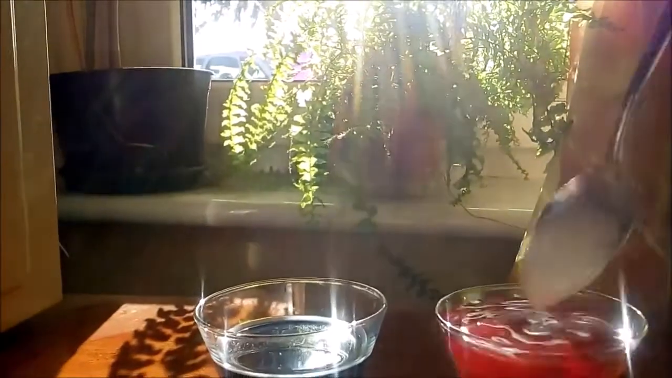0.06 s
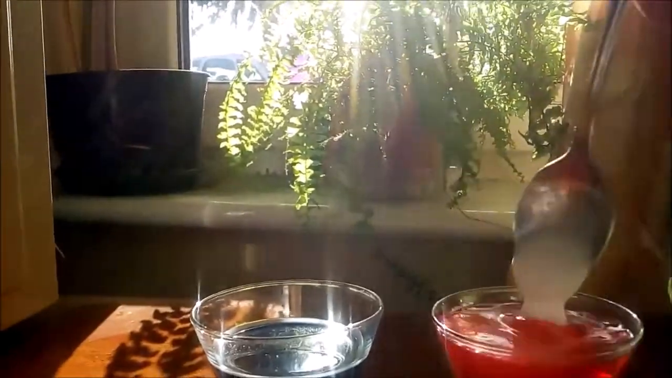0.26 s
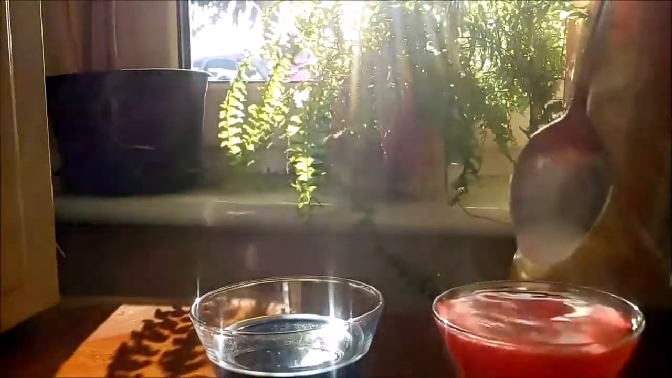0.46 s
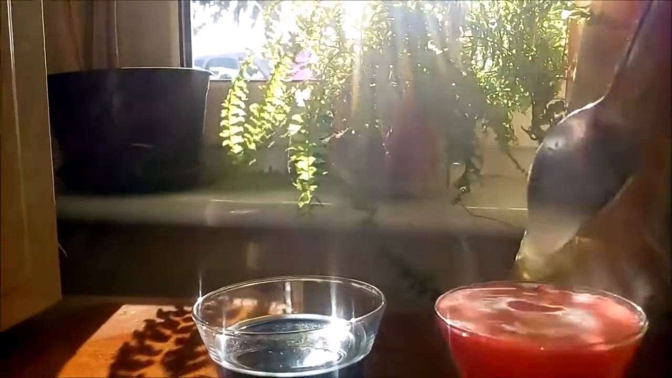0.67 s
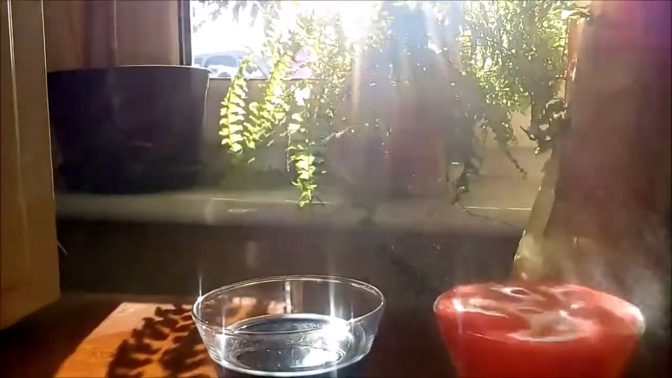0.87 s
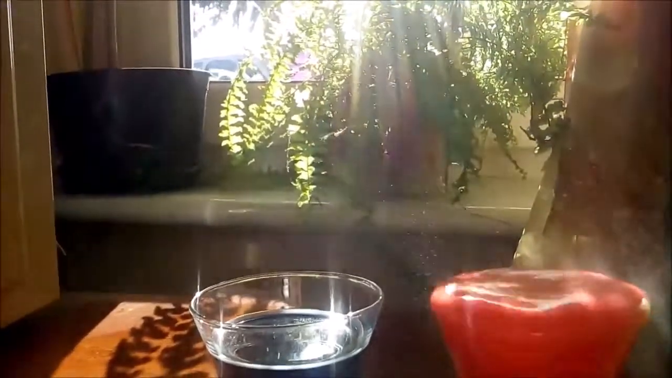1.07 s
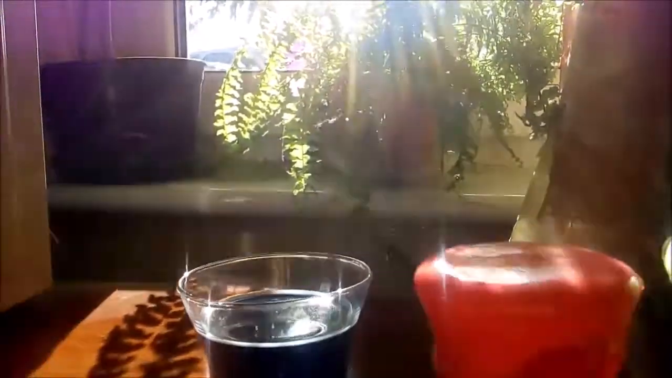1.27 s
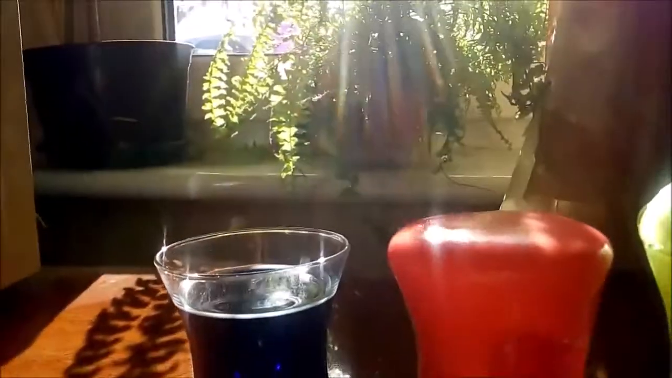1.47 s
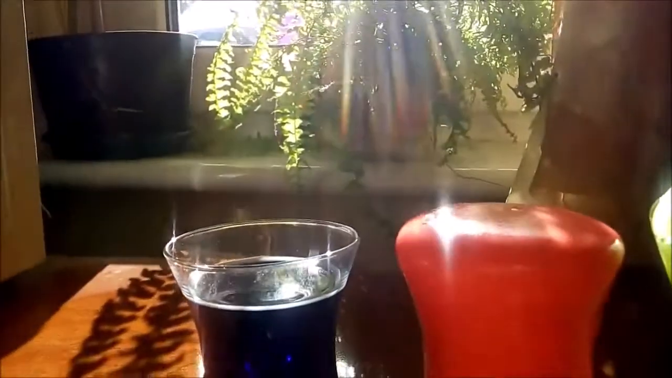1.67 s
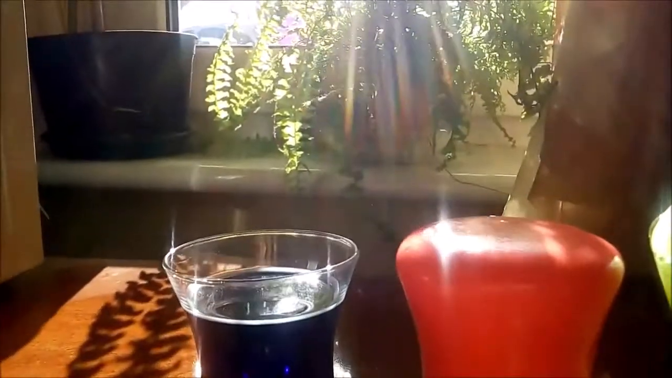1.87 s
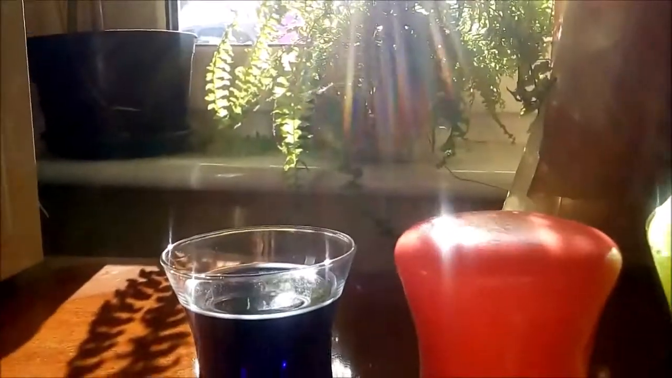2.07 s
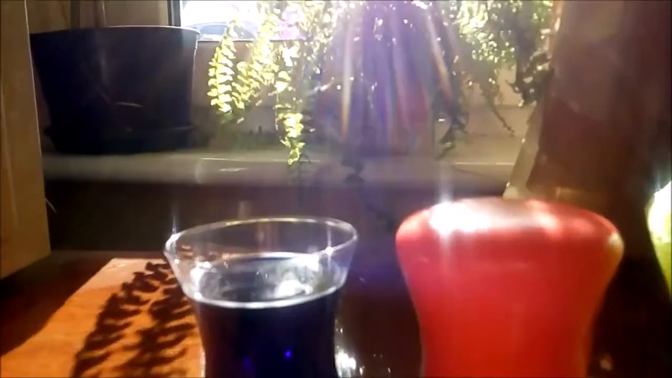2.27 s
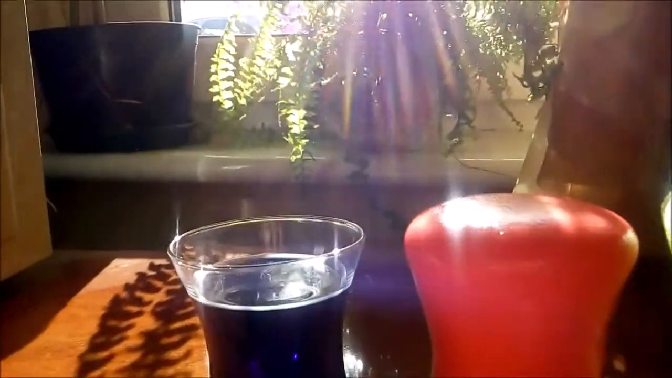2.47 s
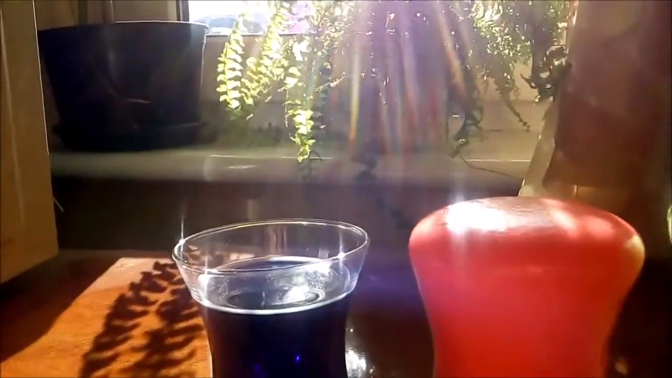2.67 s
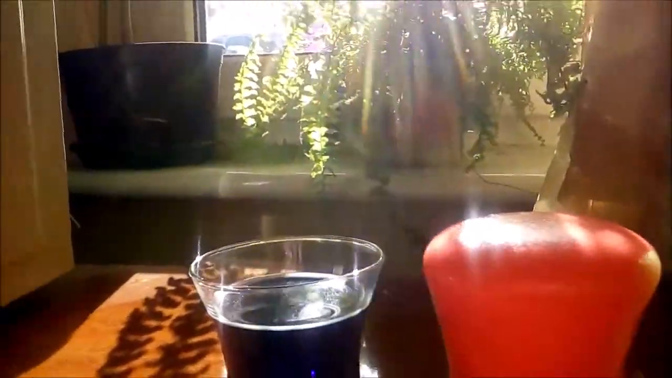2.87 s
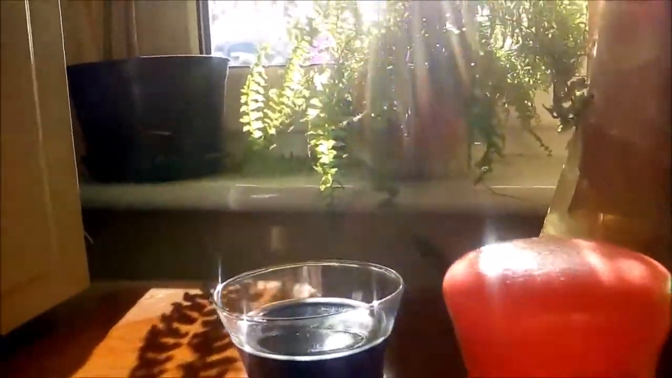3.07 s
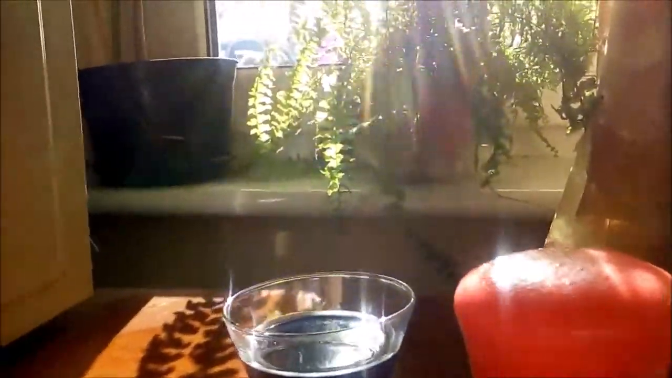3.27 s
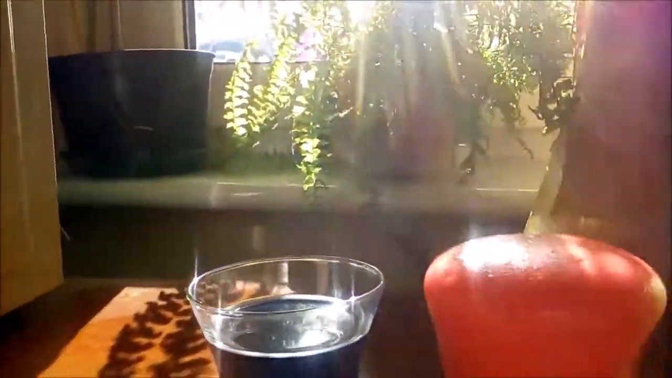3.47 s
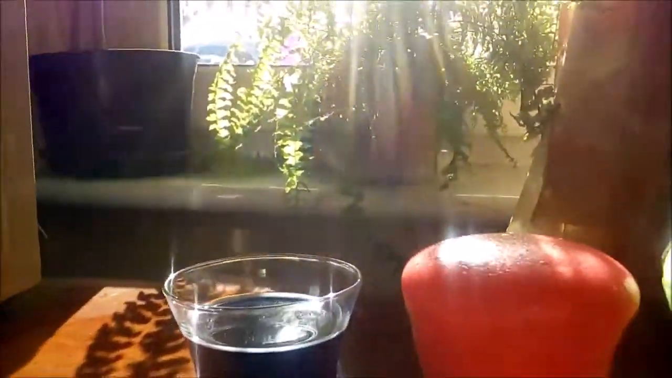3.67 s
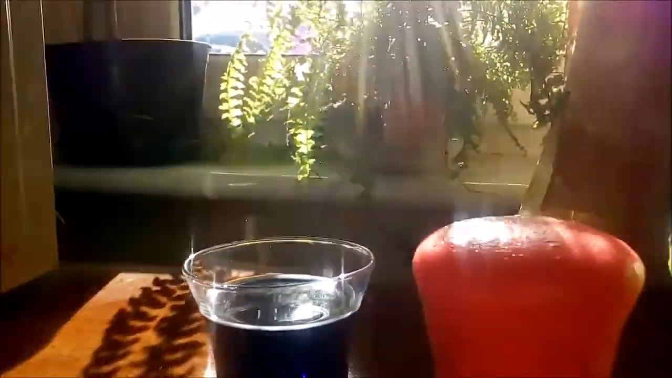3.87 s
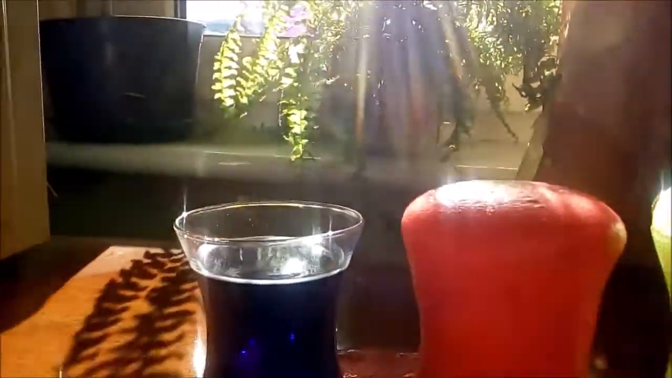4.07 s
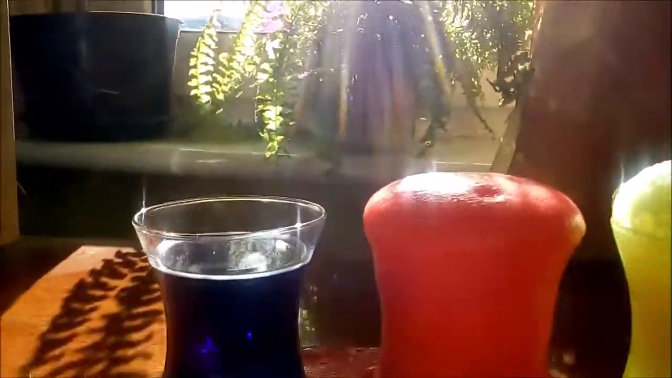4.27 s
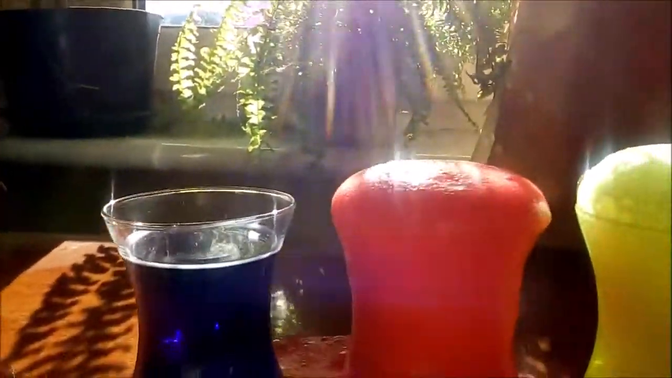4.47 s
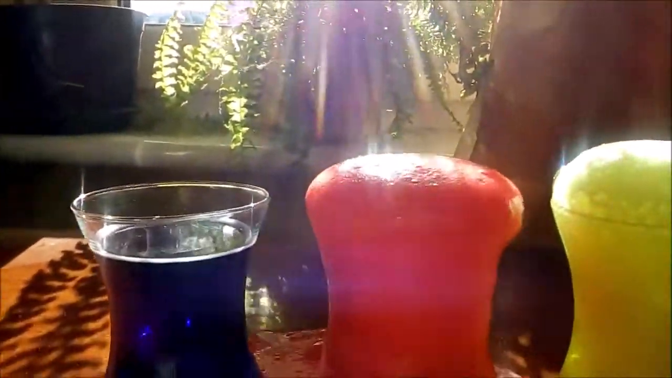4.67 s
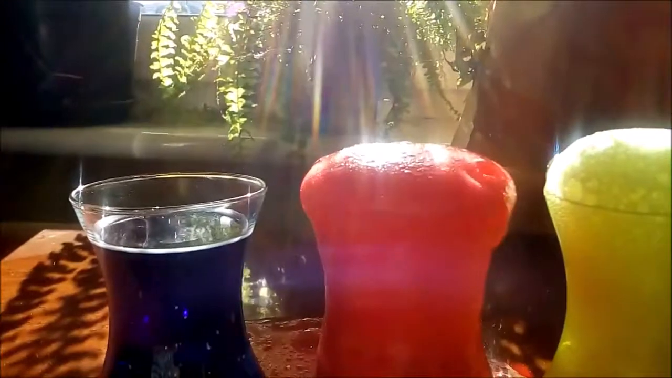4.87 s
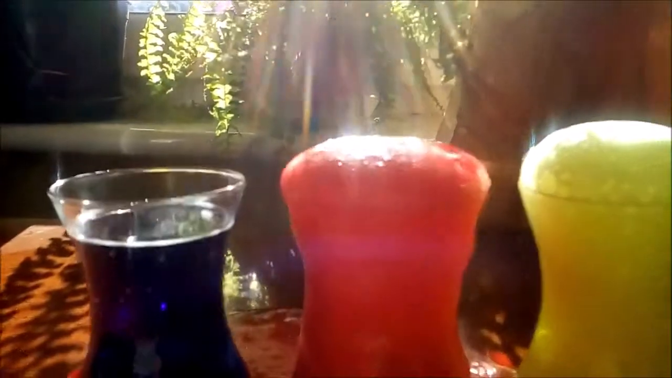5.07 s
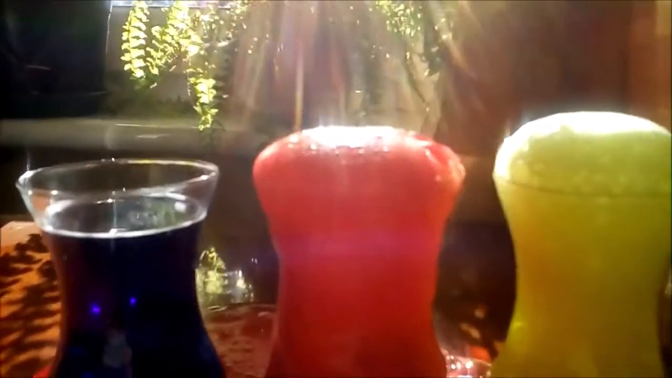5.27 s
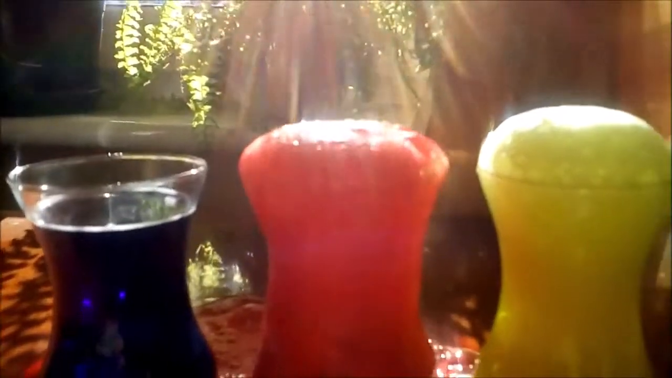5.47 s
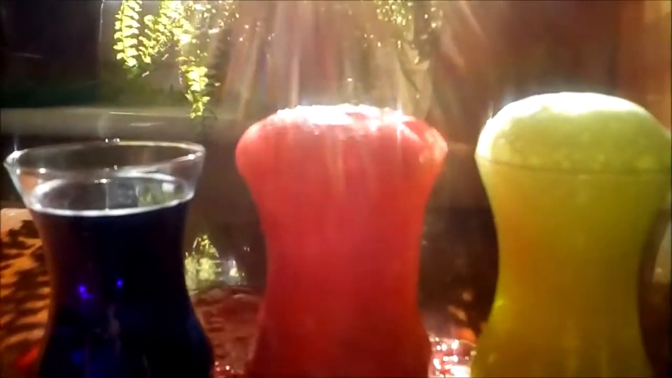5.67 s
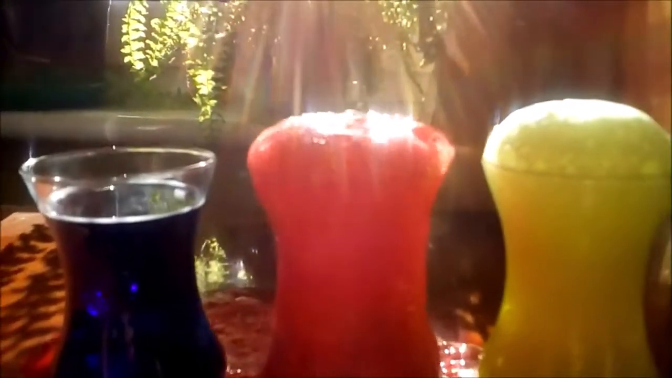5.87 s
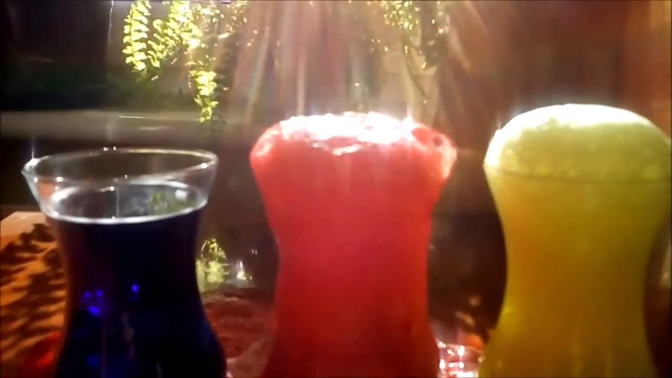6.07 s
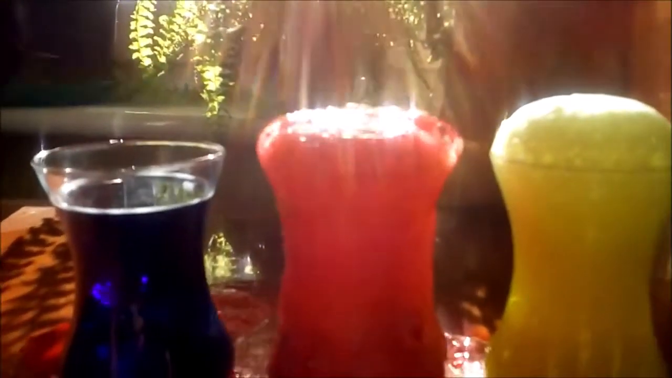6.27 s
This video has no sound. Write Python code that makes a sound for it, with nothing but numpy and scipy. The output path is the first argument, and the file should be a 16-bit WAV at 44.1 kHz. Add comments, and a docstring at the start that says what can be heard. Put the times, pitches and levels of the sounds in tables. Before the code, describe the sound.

Liquid fizzes in a glass, close to the microphone in a small, quiet room. From about 0.5 seconds the fizz comes in faint, thin, high surges, with three soft spoon taps around 1 second. Near 1.4 seconds a glass knocks and clinks on a wooden table, and the fizz jumps to a dense, frothy hiss. Two short squeaks of wet glass follow at 1.6 and 1.9 seconds, with another knock between them, then a clink and a light juddering scrape around 2.3 seconds. By 3 seconds the hiss of tiny popping bubbles is at its fullest and holds steady. Between 4.2 and 5 seconds glass is nudged and rocks on the wood in a cluster of knocks and short rubs, followed by a light clink at 5.2 seconds. Meanwhile the hiss begins to calm, growing thinner, higher and quieter to the end.

```python
"""Fizzing glass on a wooden table

Powder spooned into coloured liquid fizzes: first ringing the air in the glass, then as rising froth,
then as a dome of foam that swells over the rim and slowly calms. All three are clustered noise bursts
with moving colours. Knocks, clinks and taps are decaying modes with noisy cracks or scuffs; rubs and
squeaks are bands of friction noise. A small room, one close microphone; at moments the level dips briefly.
"""
import sys
import numpy as np
from scipy import signal
from scipy.fft import rfft, irfft, next_fast_len
from scipy.io import wavfile
from scipy.ndimage import uniform_filter1d, map_coordinates

SR = 44100
rng = np.random.default_rng(int(sys.argv[2]) if len(sys.argv) > 2 else 0)


def wav_record(signal):
    """Record a signal, one row per channel, as 16-bit PCM in the file named by sys.argv[1]."""
    frames = np.transpose(np.atleast_2d(signal))
    bounded = np.clip(frames, -1, 1)
    # unit amplitude maps onto the largest positive 16-bit level
    quanta = np.round(bounded * 32767).astype(np.int16)
    wavfile.write(sys.argv[1], SR, quanta)


N = 278712

# colour of the room's faint rush: freq_hz, relative level_db
ROOM_TONE_COLOUR = [(15, -35), (28, -13), (60, -7.5), (210, -6), (400, -10), (800, -13.5), (2000, -16),
                    (8000, -17.5), (15800, -25)]
# decay of the room by band: freq_hz, t60_s
ROOM_DECAY = [(150, 0.49), (400, 0.28), (1000, 0.29), (4000, 0.21), (12000, 0.29)]
# table, sill and window send the fizz back: delay_s, level_db
REFLECTIONS = [(.0019, -21), (.0043, -18), (.0071, -18), (.0118, -18), (.0174, -19)]
# brief dips in level, bass and treble most: centre_s, length_s, drop_db, bass_top_hz, middle_drop_db
LEVEL_DIPS = [(.283, .016, 9, 2500, 1), (.848, .034, 22, 2500, -1.5), (1.179, .016, 9, 2500, 0.5),
              (2.076, 0.02, 15, 2630, -0.5), (2.441, 0.046, 29, 2120, -1.5), (2.706, 0.03, 20, 1400, 1),
              (3.013, 0.018, 14, 1000, 0.5), (3.141, 0.015, 12, 1000, 1.5), (3.331, 0.013, 13, 1000, 0),
              (5.669, 0.031, 16, 1700, 0), (5.768, 0.017, 12, 2700, 1.5), (5.873, 0.021, 12, 2000, 2),
              (6.0, 0.019, 12, 1500, 0), (6.129, .012, 8, 1500, 0.5), (6.17, .014, 13, 1900, 0.5),
              (6.234, .014, 7, 1500, -0.5)]

# light taps while the spoon is emptied: start_s, level_db
SPOON_TAPS = [(.966, -64), (1.014, -72), (1.066, -79)]
# modes a tap rings with: freq_hz, relative level_db, t60_s
TAP_MODES = [(310, -8, .1), (520, -10, .08), (735, -7, .05), (1140, -4, .05), (1324, 0, .06),
             (2850, 2, 0.033)]
# glass dragged or nudged on the table: start_s, length_s, centre_hz, width_hz, level_db
TABLE_RUBS = [(1.602, 0.08, 1080, 432, -55), (1.653, 0.045, 947, 400, -66), (2.1, 0.17, 703, 912, -67),
              (2.275, 0.16, 339.7, 260.5, -60), (3.223, 0.048, 140, 170, -60),
              (4.228, 0.057, 166, 159, -66.5), (4.46, 0.15, 619, 1254, -62.5), (4.87, 0.13, 760, 1104, -64),
              (4.44, 0.11, 144, 80, -70), (4.86, .1, 145, 80, -70)]
# squeaks of wet glass: start_s, length_s, level_db, initial_sharpness_hz
WET_SQUEAKS = [(1.601, 0.038, -51, 80), (1.852, 0.053, -46.5, 200)]
# blows on the table: start_s, relative knock_db, thud_db against the knock, ring length (share of free t60),
# loss_db per rebound, contact click_peak_db, brightest_hz, click width (natural log of frequency)
TABLE_BLOWS = [(1.4451, -28.5, 0.5, 0.83, 6, -33, 5470, 0.77), (1.658, -52, -3, .77, 9, -51, 3400, .6),
               (1.8326, -34.5, 6.5, 0.93, 24, -16, 4160, 0.52),
               (2.2447, -35.5, -9, .65, 15, -32.5, 2800, 0.83), (3.243, -57, 4, .28, 12, -48, 650, 0.94),
               (4.259, -47.5, 3, 0.42, 9, -46, 595, .9), (4.448, -42.5, -1.5, .35, 14, -38, 850, 0.47),
               (4.4792, -45, 12, .22, 18, -38, 2200, .8), (4.497, -39, 6, .19, 22, -34.5, 1160, 0.74),
               (4.506, -55, 0, .2, 20, -48, 1000, .4), (4.511, -51, 6.5, 0.26, 7, -45, 1000, .8),
               (4.603, -55.5, 3.5, .5, 12, -52, 1500, .8), (4.783, -54, -6, .46, 12, -49, 1150, .3),
               (4.834, -43.5, 2, .36, 19, -39, 1700, 0.95), (4.843, -45, 1, 0.36, 18, -37, 1500, .7),
               (4.886, -40, 10, .22, 21, -33.5, 1900, 0.85), (4.892, -44, 2, .25, 17, -40, 1700, .8)]
# modes of the free table top: freq_hz, relative level_db, t60_s
TABLE_MODES = [(135, -29, 0.13), (228, -18.5, 0.18), (282.7, -5.5, 0.15), (321, -6.5, 0.09),
               (354, -3, 0.13), (390, -4.5, 0.075), (404.5, -1, 0.12), (510, -11.5, 0.066),
               (650, -5.5, 0.044), (732, -6, 0.081), (802, -2.5, 0.072), (882, -3.5, 0.078),
               (938, 5, 0.025), (1002, -3, 0.078), (1074, -5.5, 0.039), (1203, -5, 0.052),
               (1760, -15, 0.079), (1970, -16, 0.065)]
# slips of a pushed glass juddering over the table: start_s, relative level_db
JUDDER_SLIPS = [(2.262, -64), (2.289, -65), (2.307, -67), (2.337, -65), (2.362, -69), (2.382, -69.5),
                (2.403, -70.5), (2.419, -68)]
# light clinks and big bursting bubbles that leave the table still: start_s, peak_db, brightest_hz
LIGHT_CLINKS = [(1.661, -37.5, 3500), (2.257, -32, 6500), (4.318, -37.5, 2370), (4.948, -41, 2000),
                (5.217, -31, 6600), (5.221, -42, 6640)]
# modes of spoon on glass: freq_hz, relative level_db, t60_s
SPOON_MODES = [(2070, -29, 0.024), (2820, -6, 0.027), (3550, -6, 0.043), (3940, -8, 0.037),
               (4370, -2.5, 0.037), (4630, 10, 0.0038), (6000, -11, 0.023), (6670, 2.5, 0.04),
               (7140, -9, 0.097)]
# colour of every clink: freq_hz, relative level_db
CLINK_TONE = [(60, -30), (400, 1.5), (7200, -7), (8200, -16), (9500, -10), (10700, -7), (12000, -13),
              (15000, -20)]

# resonances of the air above the liquid, before tuning: centre_hz, width_hz, relative level_db
AIR_MODES = [(2790, 200, -2), (3650, 450, 0.5), (4090, 660, 1), (5430, 510, -4.5), (6130, 470, 2),
             (6720, 480, 0)]
# the lower air resonances sag and recover as the liquid heaves: time_s, pitch_ratio
LOWER_AIR_TUNING = [(.55, 1.06), (.75, .99), (.88, 0.91), (1.02, .99), (1.35, 1.06)]
# each lump of powder makes the fizz surge: peak_s, rise_s, upper resonances level_db, lower level_db
POWDER_SURGES = [(.56, 0.083, -68.5, -75), (.72, 0.12, -62, -67.5), (.83, 0.08, -66, -65),
                 (.99, 0.063, -66, -84), (1.07, 0.059, -67.5, -71), (1.43, 0.21, -65.5, -69)]
# fizz between surges: upper resonances level_db, lower resonances level_db
SIMMER_LEVELS = [-80.5, -85.5]
# colour of the froth: freq_hz, relative level_db
FROTH_TONE = [(250, -43), (600, -6), (900, -10), (1250, -1.5), (2000, -3.5), (2700, -0.5), (3600, -0.5),
              (4300, -1), (5000, -1.5), (5700, -1), (7000, -3.5), (8000, -13), (10000, -21.5),
              (12000, -23.5), (15800, -32)]
# colour of the foam dome: freq_hz, relative level_db
DOME_TONE = [(200, -7), (600, 4), (1100, -1), (2000, 0.5), (2600, -1), (3300, -0.5), (5500, -3), (7000, -3),
             (7700, -7.5), (9000, -13.5), (10000, -17.5), (11000, -20), (13000, -35)]
# colour of the finest bubbles: freq_hz, relative level_db
FINE_TONE = [(7000, -14), (9500, -2), (11000, -2), (12500, 1), (13700, -1), (14700, -2), (16000, -12)]

TOP_HZ = 15800
DIP_TREBLE_HZ = 8000  # where the treble of a dip begins
# scuff under a tap: share of the tap level, then length, centre and width
TAP_SCUFF, TAP_SCUFF_S, TAP_SCUFF_HZ, TAP_SCUFF_WIDTH_HZ = 0.37, 0.05, 1147, 697
CATCHES_PER_S, CATCH_DB = 228, 4  # the glass catches on the wood grain: how often, how unevenly
SQUEAK_HZ, SQUEAK_WIDTH_HZ, SQUEAK_SAG_S = 3560, 92, 0.018  # settled pitch, width, how soon it settles

GAP_HZ, GAP_WIDTH_HZ = 590, 42  # the table hardly sounds between its low and high modes
THUD_RISE_S, KNOCK_ROOM_DB = 0.0032, -5  # swell of the low modes; the room's answer to a blow
SLIP_THUD_DB, SLIP_LENGTH = 14, 0.49  # a slip stirs mostly low modes, and the hand damps them
# a struck glass rocks: first gap, each gap over the last, unevenness (natural log)
REBOUND_S, REBOUND_SHRINK, REBOUND_SCATTER = 0.025, 0.82, 0.0617
CRACK, CRACK_T60_S, SNAP = 4.1, 0.012, 11.5  # before filtering: noisy crack, its decay, first sharp snap
CLINK_SPREAD, LEAD_S = 0.26, 0.004  # light clink width (natural log of frequency); silence before a snap

SURGE_FALL_DB_PER_S = 47
AIR_SPLIT_HZ = 4800  # between the lower and upper resonances
SIMMER_CLUSTER_DB, FOAM_CLUSTER_DB = 1.2, 0.8
# the froth comes up fast, keeps growing, and gives way to the dome
FROTH_FULL_S, FROTH_END_S, FROTH_DB = 1.466, 2.724, -51.5
FROTH_RISE_DB_PER_S, FROTH_GROWTH_DB_PER_S, FROTH_FALL_DB_PER_S = 240, 1.9, 47
# the low edge of its hiss sinks as the bubbles grow, and drops further once the foam bulges
FROTH_EDGE_START_HZ, FROTH_EDGE_END_HZ, FROTH_COARSEN_S, EDGE_HALVE_S = 4500, 1970, 0.69, 0.3
# the dome bulges over the rim, holds, then calms ever faster in ever more distinct clusters
DOME_FULL_S, DOME_DB, DOME_RISE_DB_PER_S = 2.888, -47.5, 55
CALM_FROM_S, CALM_DB_PER_S2, CALM_CLUMPING_DB_PER_S = 4.084, 1.38, 0.6
DOME_EDGE_HZ, EDGE_HZ_PER_DB = 1417, 135  # the low edge of its hiss rises as it calms
# the finest bubbles come up later, multiply, and calm less
FINE_DB, FINE_FULL_S, FINE_RISE_DB_PER_S = -63, 3.2, 9
FINE_GROWTH_DB_PER_S, FINE_CALM_SHARE = 1.45, 0.67
# the hollow in the hiss leaps up with the bulge, then creeps on and deepens
BULGE_AT_S, BULGE_S = 2.62, 0.23
HOLLOW_START_HZ, HOLLOW_LEAP_HZ, HOLLOW_CREEP_HZ_PER_S = 1410, 2340, 136
HOLLOW_DB, HOLLOW_DEEPEN_DB_PER_S = 7.5, 0.05
HOLLOW_OPEN_S, UPPER_HOLLOW_OPEN_S = 0.08, 0.26
UPPER_HOLLOW_RATIO = 2.433  # against the hollow frequency
RIDGE_RATIO, RIDGE_SHARE = 1.49, 0.22  # bright band between the hollows: frequency, height


def amp(db):
    """Decibels to gain."""
    return 10 ** (np.asarray(db) / 20)


def unit(x):
    """Scale to rms 1."""
    return x / np.sqrt(np.mean(x ** 2) + 1e-20)


def since(t, s):
    """Seconds passed since s, zero before."""
    return np.maximum(t - s, 0)


def along(points, hz):
    """Read (frequency, value) points on a log-frequency axis."""
    f, v = np.transpose(points)
    return np.interp(np.log(hz + 1), np.log(f + 1), v)


def above(hz, edge_hz, steepness):
    """High-pass gain."""
    return 1 / np.sqrt(1 + (edge_hz / (hz + 1)) ** steepness)


def filtered(x, response):
    """Shape x by a response of frequency, padded so its tail does not wrap round."""
    m = next_fast_len(x.shape[-1] + 8192)
    spectrum = rfft(x, m) * response(np.fft.rfftfreq(m, 1 / SR))
    return irfft(spectrum, m)[..., :x.shape[-1]]


def add(track, s, sound):
    """Mix a sound into the track at s seconds."""
    part = track[round(s * SR):][:len(sound)]
    part += sound[:len(part)]


def room_tone():
    """The faint steady rush of the room, as coloured noise."""
    rush = filtered(rng.standard_normal(N), lambda hz: amp(along(ROOM_TONE_COLOUR, hz)))
    return amp(-75.5) * unit(rush)


def room(x):
    """The room's answer: a noise tail with its own decay in each band."""
    hz, t, z = signal.stft(rng.standard_normal(SR // 2), SR, nperseg=256)
    decay = amp(-60 * t / along(ROOM_DECAY, hz)[:, None])
    onset = 1 - np.exp(-t / 0.0019)
    tail = signal.istft(z * decay * onset, SR, nperseg=256)[1]
    low_band = rfft(tail)[:len(tail) // 20]
    tail = tail / np.sqrt(np.mean(abs(low_band) ** 2))  # unit gain in the low band
    return signal.fftconvolve(x, tail)[:len(x)]


def friction(length, hz, width_hz):
    """A band of friction around hz that swells quickly and fades: two random grips on a carrier."""
    u = np.linspace(0, 1, round(length * SR))
    grip = [map_coordinates(rng.standard_normal(size=512), [u * length * width_hz], mode="mirror")
            for _ in range(2)]
    phase = 2 * np.pi * np.cumsum(hz * np.ones_like(u)) / SR
    band = grip[0] * np.cos(phase) + grip[1] * np.sin(phase)
    return np.sin(np.pi * u ** 0.45) * unit(band)


def rubs():
    """Glass dragged a little way: dull and broad on wood, a narrow sagging squeak where it is wet."""
    out = np.zeros(N)
    for s, length, hz, width_hz, db in TABLE_RUBS:
        slide = friction(length, hz, width_hz)
        grain = np.arange(len(slide)) * CATCHES_PER_S / SR
        catches = map_coordinates(rng.standard_normal(size=512), [grain], mode="mirror")
        add(out, s, amp(db) * slide * unit(amp(CATCH_DB * catches)))
    for s, length, db, sharp_hz in WET_SQUEAKS:
        t = np.arange(round(length * SR)) / SR
        pitch_hz = SQUEAK_HZ + sharp_hz * np.exp(-t / SQUEAK_SAG_S)
        add(out, s, amp(db) * friction(length, pitch_hz, SQUEAK_WIDTH_HZ))
    return out


def taps():
    """Soft taps: a short hollow ring of decaying modes and a friction scuff."""
    out, t = np.zeros(N), np.arange(SR // 4) / SR
    for s, db in SPOON_TAPS:
        ring = sum(rng.choice([-1, 1]) * amp(level - 60 * t / t60) * np.sin(2 * np.pi * hz * t)
                   for hz, level, t60 in TAP_MODES)
        add(out, s, amp(db) * ring)
        scuff = friction(TAP_SCUFF_S, TAP_SCUFF_HZ, TAP_SCUFF_WIDTH_HZ)
        add(out, s, amp(db) * TAP_SCUFF * scuff)
    return out


def rocking(db, loss_db, count):
    """A blow and its generally quicker, ever weaker rebounds, as (seconds after the blow, level in dB)."""
    k = np.arange(count)
    gaps = REBOUND_S * REBOUND_SHRINK ** k * np.exp(REBOUND_SCATTER * rng.standard_normal(count))
    return zip(np.cumsum(gaps) - gaps, db - loss_db * k)


def table_ring(thud_db, length):
    """One contact rings the table top: high modes answer at once, low ones take a moment to swell."""
    t, ring = np.arange(SR // 4) / SR, 0
    thud = amp(thud_db) * (1 - np.exp(-t / THUD_RISE_S))
    for hz, db, t60 in TABLE_MODES:
        decay = amp(db + rng.normal(0, 0.75) - 60 * t / (t60 * length))
        mode = decay * np.sin(2 * np.pi * hz * t)
        ring = ring + rng.choice([-1, 1]) * mode * (thud if hz < GAP_HZ else 1)
    return ring


def knocks():
    """Glasses are set down, rock and judder; each blow sets how strongly the table's low modes sound."""
    out = np.zeros(N)
    for start, knock_db, thud_db, length, loss_db, *_ in TABLE_BLOWS:
        blow = np.zeros(SR)
        for s, db in rocking(knock_db, loss_db, count=6):
            add(blow, s, amp(db - 7.5) * table_ring(thud_db, length))
        add(out, start, blow + amp(KNOCK_ROOM_DB) * room(blow))
    for s, db in JUDDER_SLIPS:
        add(out, s, amp(db) * table_ring(SLIP_THUD_DB, SLIP_LENGTH))
    out = signal.lfilter(*signal.iirnotch(GAP_HZ, GAP_HZ / GAP_WIDTH_HZ, fs=SR), out)
    # a small table radiates little bass
    return signal.sosfilt(signal.butter(N=2, Wn=105, btype="high", fs=SR, output="sos"), out)


def clinks():
    """A sharp snap, a noisy crack and a short ring of modes, damped by the liquid."""
    out, t = np.zeros(N), np.arange(SR // 4) / SR
    contacts = [(s, click_db, bright_hz, spread) for s, *_, click_db, bright_hz, spread in TABLE_BLOWS]
    contacts += [(*row, CLINK_SPREAD) for row in LIGHT_CLINKS]
    for s, db, bright_hz, spread in contacts:
        def focus(hz):
            """Bright band of this contact."""
            return np.exp(-(np.log((hz + 1) / bright_hz) / spread) ** 2)

        def colour(hz):
            """Clink tone without the bass."""
            return amp(along(CLINK_TONE, hz)) * above(hz, bright_hz / 4, steepness=3)

        strengths_db = rng.normal(0, 2, len(SPOON_MODES))
        ring = 0
        for (hz, level, t60), extra_db in zip(SPOON_MODES, strengths_db):
            decay = amp(level + extra_db - 60 * t / t60)
            ring = ring + rng.choice([-1, 1]) * focus(hz) * decay * np.sin(2 * np.pi * hz * t)
        crack = CRACK * rng.standard_normal(len(t)) * amp(-60 * t / CRACK_T60_S)
        crack[0] += SNAP
        # silence first, so the snap is not cut
        ring, crack = np.pad([ring, crack], [(0, 0), (round(LEAD_S * SR), 0)])
        hit = filtered(ring + filtered(crack, focus), colour)
        add(out, s - LEAD_S, amp(db) * hit / abs(hit).max())
    return out + amp(-13) * room(out)


def bubbles(per_second, spread_db, cluster_db, clumping_db_per_s=0):
    """Tiny bursts of uneven size in clusters, as (frequencies, times, short-time spectrum)."""
    counts = rng.poisson(per_second / SR, N)
    bursts = np.sqrt(counts) * rng.standard_normal(N) * amp(spread_db * rng.standard_normal(N))
    hz, t, z = signal.stft(unit(bursts), SR, nperseg=512, noverlap=384)
    # random levels smoothed over frequency, then over time
    clusters = uniform_filter1d(rng.standard_normal(z.shape), size=5, axis=0)
    clusters = uniform_filter1d(clusters, size=12, axis=1)
    depth_db = cluster_db + clumping_db_per_s * since(t, CALM_FROM_S)
    return hz[:, None], t, z * amp(depth_db * unit(clusters))


def voiced(z, colour, db):
    """The bursts heard through a changing colour, levelled by db at each moment."""
    gain = colour / np.sqrt(np.mean(colour ** 2, axis=0)) * amp(db)
    return signal.istft(z * gain, SR, nperseg=512, noverlap=384)[1][:N]


def surging(t):
    """Levels in dB of upper and lower resonances: surges swell and die away over a faint simmer."""
    power = amp(np.reshape(SIMMER_LEVELS, (-1, 1))) ** 2
    for s, rise_s, upper_db, lower_db in POWDER_SURGES:
        swell = amp(-SURGE_FALL_DB_PER_S * since(t, s)) * np.exp(-(since(s, t) / rise_s) ** 2)
        power = power + (amp([[upper_db], [lower_db]]) * swell) ** 2
    return 10 * np.log10(power)


def air_ring(modes, pitch, hz):
    """Resonances of the air in the glass, their powers summed."""
    return np.sqrt(sum(amp(level) ** 2 / (1 + ((hz - centre * pitch) / (width / 2)) ** 2)
                       for centre, width, level in modes))


def simmer():
    """The first bubbles ring the air left in the glass, until froth fills it."""
    hz, t, z = bubbles(per_second=11000, spread_db=-0.5, cluster_db=SIMMER_CLUSTER_DB)
    times, ratios = np.transpose(LOWER_AIR_TUNING)
    tuning = np.interp(t, times, ratios)
    lower_modes = [mode for mode in AIR_MODES if mode[0] < AIR_SPLIT_HZ]
    upper_modes = [mode for mode in AIR_MODES if mode[0] >= AIR_SPLIT_HZ]
    lower = air_ring(lower_modes, tuning, hz) * above(hz, 2570, steepness=8.1)
    treble_tilt = amp(along([(7000, 2.0), (8000, -3.0), (15000, 1)], hz))
    upper = air_ring(upper_modes, 0.98, hz) * treble_tilt
    upper_share = above(hz, AIR_SPLIT_HZ, steepness=23)
    smother_db = FROTH_RISE_DB_PER_S * since(t, FROTH_FULL_S)
    upper_db, lower_db = surging(t) - smother_db
    return voiced(z, upper * upper_share, upper_db) + voiced(z, lower * (1 - upper_share), lower_db)


def hollows(hz, t):
    """Reflections inside the bulging foam cancel in two bands and add between; all slide up as it swells."""
    age = since(t, BULGE_AT_S)
    leap = 1 - np.exp(-(age / BULGE_S) ** 2)
    hollow_hz = HOLLOW_START_HZ + HOLLOW_LEAP_HZ * leap + HOLLOW_CREEP_HZ_PER_S * age
    depth_db = HOLLOW_DB * (1 - np.exp(-age / HOLLOW_OPEN_S)) + HOLLOW_DEEPEN_DB_PER_S * age
    upper_share = 1 - np.exp(-(age / UPPER_HOLLOW_OPEN_S) ** 3)

    def band(ratio, width):
        """A bell around a multiple of the hollow frequency."""
        return np.exp(-((hz / hollow_hz - ratio) / width) ** 2)

    ridge = RIDGE_SHARE * band(RIDGE_RATIO, width=0.44)
    lower_hollow = band(0.98, width=0.26)
    upper_hollow = upper_share * band(UPPER_HOLLOW_RATIO, width=0.27)
    return amp(depth_db * (ridge - lower_hollow - upper_hollow))


def froth():
    """The froth climbs; its bubbles grow, so the hiss reaches ever lower."""
    hz, t, z = bubbles(per_second=20000, spread_db=0.0, cluster_db=FOAM_CLUSTER_DB)
    age = since(t, FROTH_FULL_S)
    db = FROTH_DB - FROTH_RISE_DB_PER_S * since(FROTH_FULL_S, t)
    db = db + FROTH_GROWTH_DB_PER_S * age - FROTH_FALL_DB_PER_S * since(t, FROTH_END_S)
    sink = np.exp(-age / FROTH_COARSEN_S)
    edge_hz = FROTH_EDGE_END_HZ + (FROTH_EDGE_START_HZ - FROTH_EDGE_END_HZ) * sink
    edge_hz = edge_hz / (1 + (since(t, BULGE_AT_S) / EDGE_HALVE_S) ** 2)
    colour = amp(along(FROTH_TONE, hz)) * above(hz, edge_hz, steepness=2.4) * hollows(hz, t)
    return voiced(z, colour, db)


def dome():
    """The dome of foam hisses freely above the rim; calming, it loses its low sounds first, its finest last."""
    hz, t, z = bubbles(per_second=30000, spread_db=0.5, cluster_db=FOAM_CLUSTER_DB,
                       clumping_db_per_s=CALM_CLUMPING_DB_PER_S)
    emerge_db = -DOME_RISE_DB_PER_S * since(DOME_FULL_S, t)
    calm_db = CALM_DB_PER_S2 * since(t, CALM_FROM_S) ** 2
    cancel = hollows(hz, t)
    edge_hz = DOME_EDGE_HZ + EDGE_HZ_PER_DB * calm_db
    colour = amp(along(DOME_TONE, hz)) * above(hz, edge_hz, steepness=5.38) * cancel
    body = voiced(z, colour, DOME_DB + emerge_db - calm_db)

    hz, t, z = bubbles(per_second=24000, spread_db=1.5, cluster_db=FOAM_CLUSTER_DB)
    fine_db = FINE_DB + emerge_db - FINE_RISE_DB_PER_S * since(FINE_FULL_S, t)
    fine_db = fine_db + FINE_GROWTH_DB_PER_S * since(t, FINE_FULL_S) - FINE_CALM_SHARE * calm_db
    return body + voiced(z, amp(along(FINE_TONE, hz)) * cancel, fine_db)


def with_echoes(x):
    """Nearby surfaces comb the hiss with fine ripples."""
    return filtered(x, lambda hz: 1 + sum(amp(db) * np.exp(-2j * np.pi * hz * delay)
                                          for delay, db in REFLECTIONS))


def thinned(x):
    """Now and then the level dips briefly, leaving mostly the middle of the spectrum."""
    hz, t, z = signal.stft(x, SR, nperseg=256, noverlap=192)
    for s, length, drop_db, bass_hz, middle_db in LEVEL_DIPS:
        middle = above(hz, bass_hz, steepness=24) * (1 - above(hz, DIP_TREBLE_HZ, steepness=40))
        middle = middle[:, None]
        moment = np.exp(-((t - s) / (length / 2)) ** 4)
        z = z * amp(-moment * (drop_db * (1 - middle) + middle_db * middle))
    return signal.istft(z, SR, nperseg=256, noverlap=192)[1][:N]


def scene():
    """One microphone feeds both channels."""
    fizz = with_echoes(simmer() + froth() + dome())
    rubbing = filtered(rubs(), lambda hz: above(hz, edge_hz=65, steepness=3.8))
    mono = thinned(fizz + knocks() + clinks() + taps() + rubbing + room_tone())
    return np.array([mono, mono])


def record(dry):
    """The recorder keeps nothing above its band limit."""
    return filtered(dry, lambda hz: hz < TOP_HZ)


dry = scene()
out = record(dry)
wav_record(out)
```